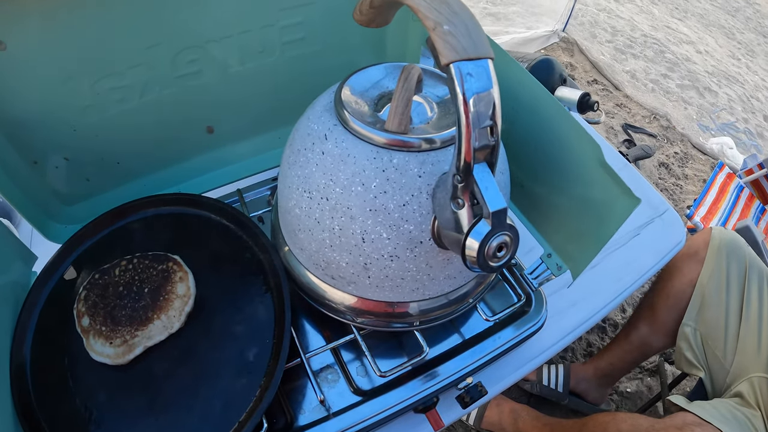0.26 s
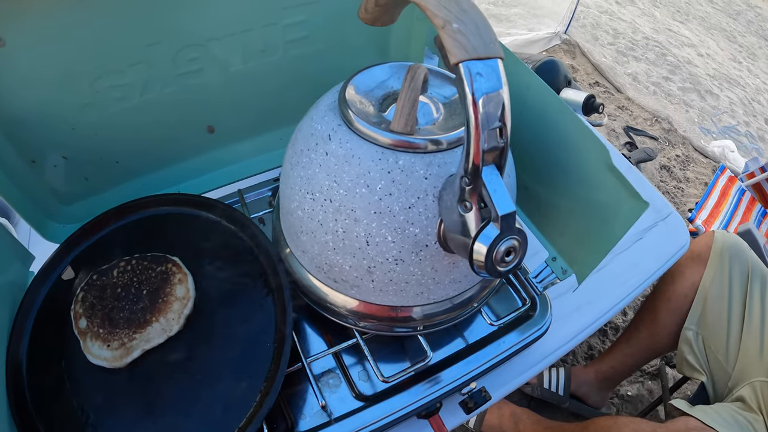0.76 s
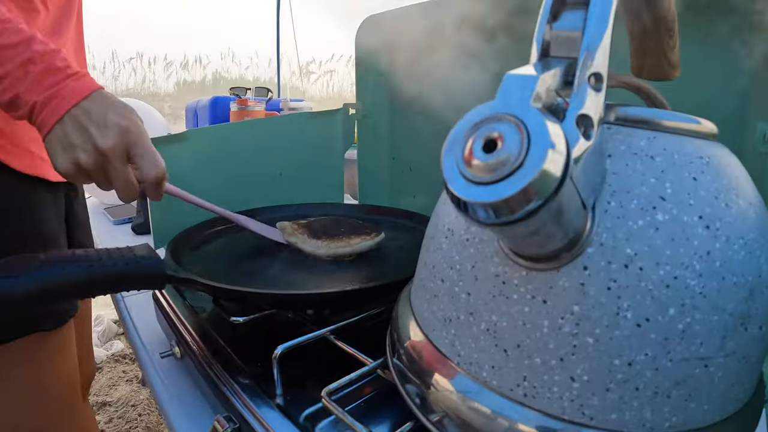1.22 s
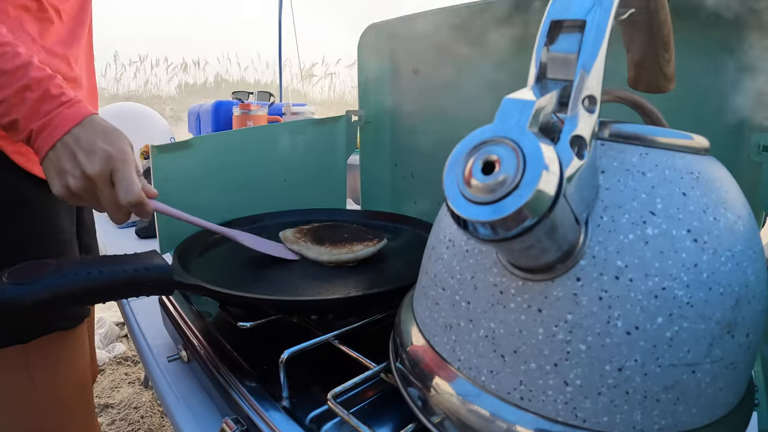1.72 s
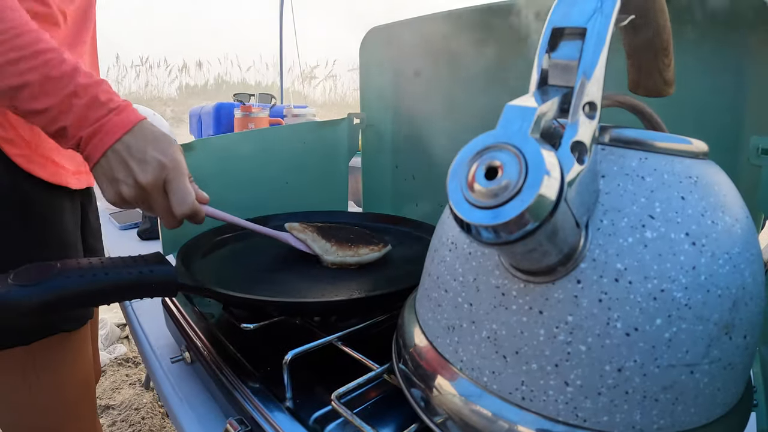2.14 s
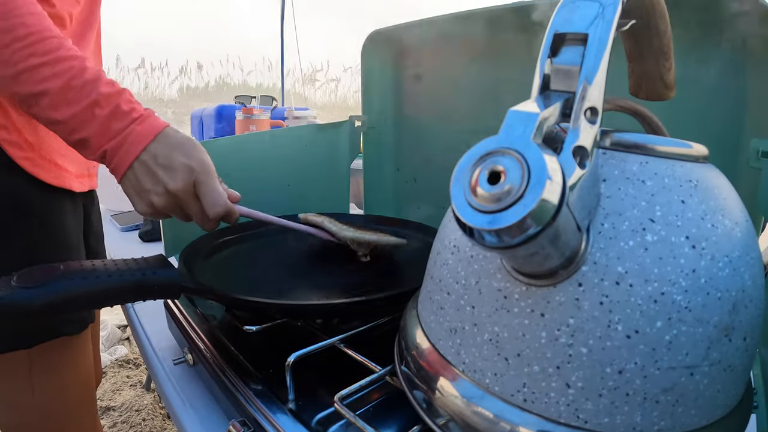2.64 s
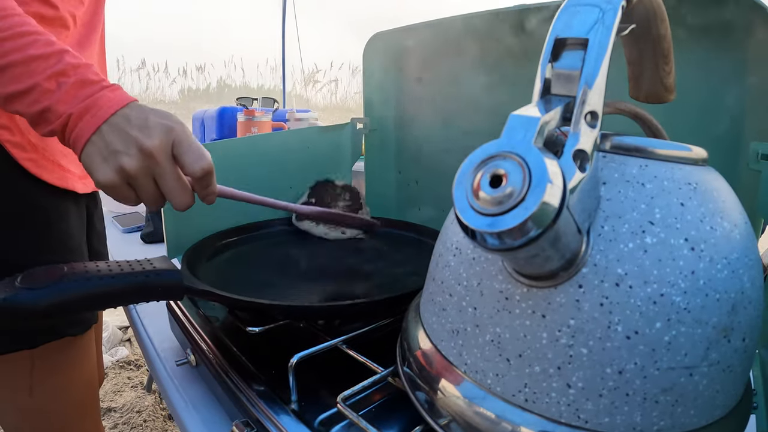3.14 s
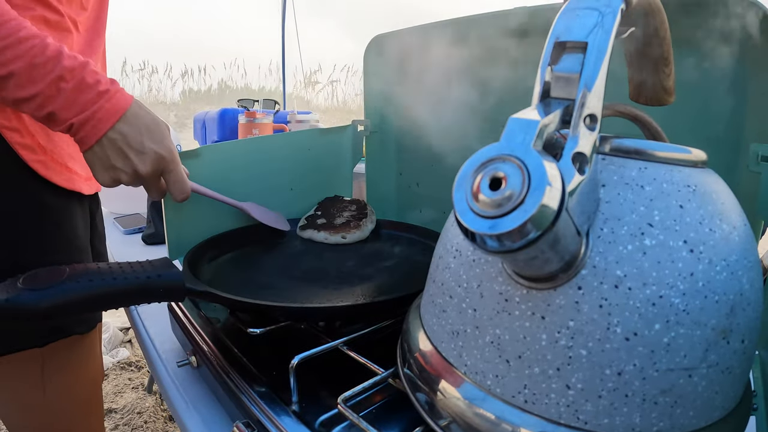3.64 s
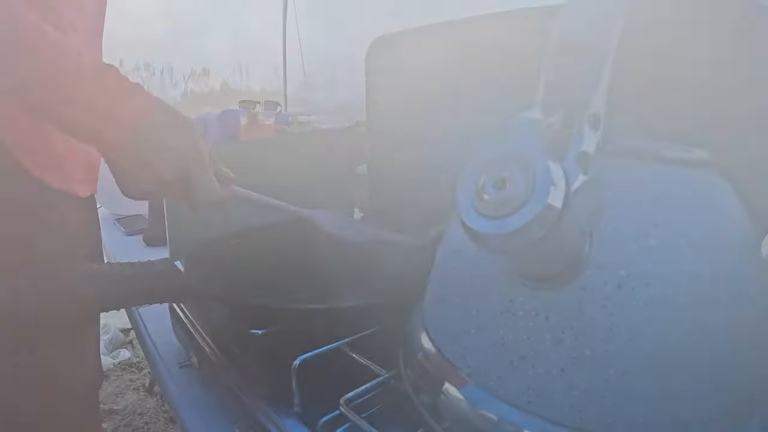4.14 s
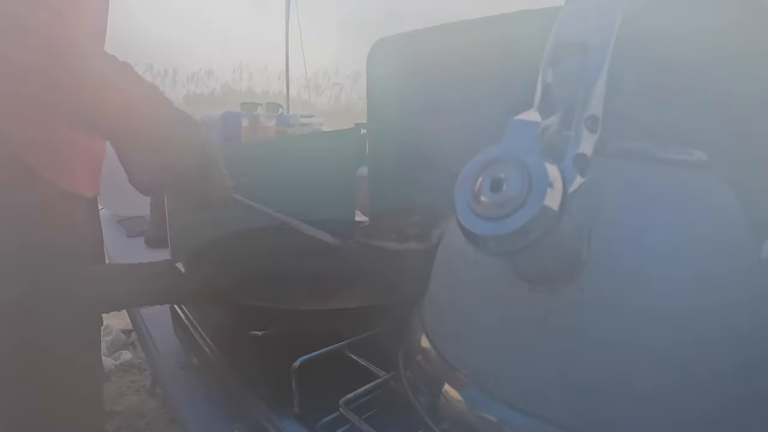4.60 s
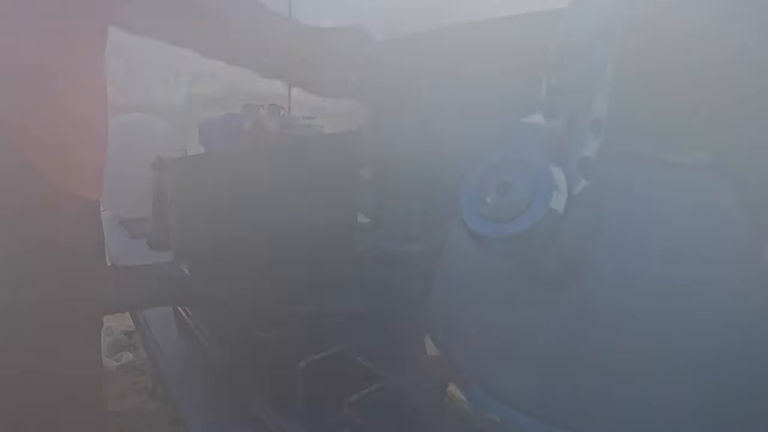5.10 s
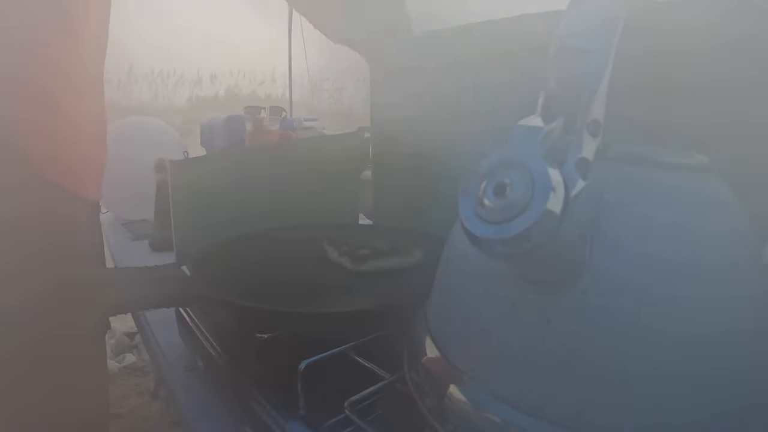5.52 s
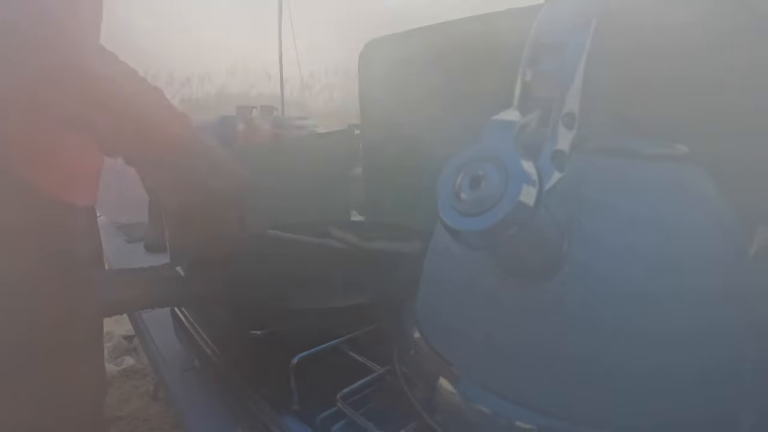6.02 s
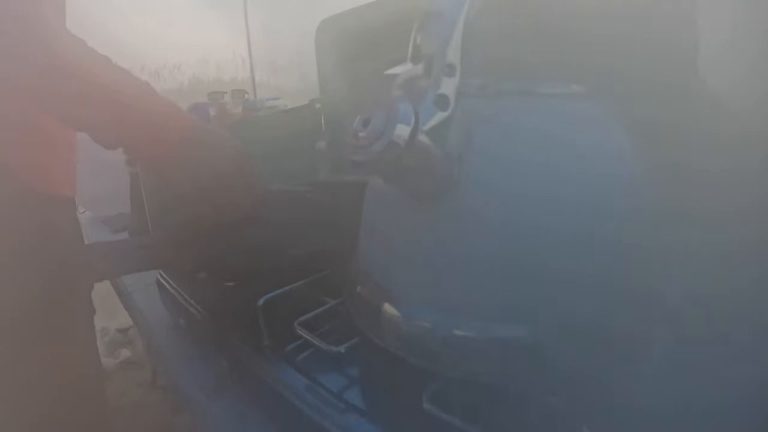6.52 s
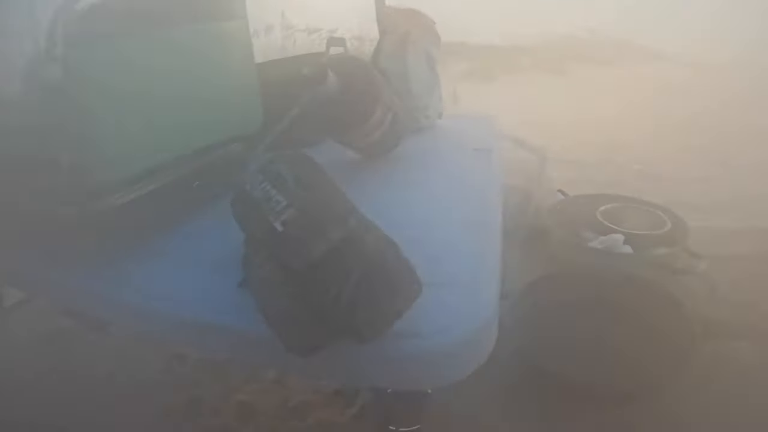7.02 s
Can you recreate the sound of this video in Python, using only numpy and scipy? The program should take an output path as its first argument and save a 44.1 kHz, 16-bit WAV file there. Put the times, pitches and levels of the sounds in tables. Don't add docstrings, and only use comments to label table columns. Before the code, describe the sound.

Outdoors, close to a small stereo camera, a gas burner roars low while its jet rings in the stove's metal. At about one second the sound cuts briefly to silence, then resumes beside a kettle: steam hisses and a thin high whistle sings, falters, and jumps to a stronger lower note that wavers upward. Two soft spatula taps and light wind puffs pass before the whistle weakens as the camera swings away.

```python
import sys
import numpy as np
from scipy import signal
from scipy.io import wavfile
from scipy.ndimage import uniform_filter1d

SR = 44100
rng = np.random.default_rng(int(sys.argv[2]) if len(sys.argv) > 2 else 0)


def materialize(psi):
    bounded = np.clip(np.atleast_2d(psi).T, -1, 1)
    quanta = np.round(bounded * 32767).astype(np.int16)
    wavfile.write(sys.argv[1], SR, quanta)


def how_loud(loudness_db):
    steps = np.asarray(loudness_db, float) / 20
    return 10 ** steps


N = 319794

VIEW_END, RESUME = 1.0115, 1.0925
FLIP = 1.7835
DRIFT, SIDESTEP, SWING = (3.6, 4.78), (5, 6.49), (6.63, 7.265)


def evened(x):
    return x / np.sqrt(np.mean(abs(x) ** 2) + 1e-20)


def read(points, hz):
    f, value = np.transpose(points)
    return np.interp(np.log(hz + 1), np.log(f + 1), value, left=value[0], right=value[-1])


def columns(rows, t):
    s, *values = np.transpose(rows)
    return [np.interp(t, s, v) for v in values]


def ramp(t, start, end):
    return np.clip((t - start) / (end - start), 0, 1)


def bumps(rows, t):
    return sum(height * np.exp(-((t - s) / half) ** 2) for s, half, height in rows)


def wander(hz):
    return evened(signal.lfilter(*signal.butter(2, hz, fs=SR), rng.standard_normal(N)))


def moved(t, amounts):
    return sum(amount * ramp(t, *move) for amount, move in zip(amounts, (DRIFT, SIDESTEP, SWING)))


def humps(modes, hz, scale=1):
    power = 0
    for f, width, db in modes:
        power = power + how_loud(2 * db) / (1 + (2 * (hz - f * scale) / width) ** 2) ** 1.48
    return np.sqrt(power)


def grid():
    return np.fft.rfftfreq(2048, 1 / SR)[:, None], np.arange(N // 512 + 5) * 512 / SR


def unit(shape, hz, lo_hz, hi_hz):
    band = (hz > lo_hz) * (hz < hi_hz)
    return shape / np.sqrt((shape ** 2 * band).sum(0) * 4)


def noise(shape, side_db, tied, lean, patchy_db):
    draws = rng.standard_normal((shape.shape[1], shape.shape[0], 5), dtype=np.float32)
    a, b, c, d, patches = draws.T
    patches = uniform_filter1d(patches, size=10, axis=0)
    patches = evened(uniform_filter1d(patches, size=10, axis=1))
    tied = np.clip(tied, 0, 1)
    mid = a + 1j * b
    own = np.sqrt(1 - tied ** 2) * (c + 1j * d)
    side = how_loud(side_db) * (tied * np.exp(1j * lean) * mid + own)
    spectra = np.array([mid - side, mid + side]) * shape * how_loud(patchy_db * patches)
    pair = signal.istft(spectra, nperseg=2048, noverlap=1536)[1]
    return pair[:, :N] / np.sqrt(8 / 3)


# frequency in Hz, side minus mid in dB.
WIDTH_ABOVE = [(60, -32.5), (150, -42), (380, -19), (950, -10), (2380, -6.5), (5980, -12), (15000, 3.5)]
# frequency in Hz, side minus mid in dB.
WIDTH_BESIDE = [(60, -23), (150, -33.5), (400, -14), (1000, -31.5), (2500, -14), (4000, -42), (5500, 1),
                (8000, -17.5), (15000, -4)]


def width_db(hz, t):
    open_s = 3.65
    turned_db = -46 + 17 * ramp(t, open_s - .1, open_s + .05) + moved(t, (8.5, -0.5, 5))
    return np.where(t < RESUME, read(WIDTH_ABOVE, hz), read(WIDTH_BESIDE, hz) + turned_db + 20)


# time in seconds, half length in seconds, level in dB.
WIND_PUFFS = [
    (5.211, 0.08, -31),
    (6.103, 0.1, -41.5),
    (6.752, 0.069, -66),
]
# time in seconds, level in dB, pitch in Hz, seconds to fade by 60 dB.
SPATULA_TAPS = [
    (3.293, -38, 860, 0.092),
    (3.87, -40, 740, 0.09),
]


def small_sounds():
    t = np.arange(N) / SR
    puff = bumps([(s, half, how_loud(db)) for s, half, db in WIND_PUFFS], t)
    out = puff * (wander(90) + .5 * np.array([wander(180), wander(160)]))
    for s, db, hz, t60 in SPATULA_TAPS:
        since = np.maximum(t - s, 0)
        out = out + how_loud(db - 60 * since / t60) * np.sin(2 * np.pi * hz * since)
    return out


# frequency in Hz, level in dB per Hz.
FLAME_ROAR = [(12, -36.5), (20, -3), (70, 3), (119, 1), (151, -2.5), (198, -2.5), (426, -14.5), (558, -25),
              (900, -42), (1170, -49), (1980, -120)]
# frequency in Hz, width in Hz, level in dB.
METAL_ABOVE = [(1198.5, 32.6, 1), (1353, 95, -13), (1730, 175, -19.5), (1880, 77, -27.5), (3388, 90, -19.5),
               (3540, 190, -27), (4340, 340, -31.5), (4870, 120, -32.5), (5790, 300, -34),
               (7100, 200, -41.5), (9750, 300, -48.5), (12000, 400, -53)]
# frequency in Hz, width in Hz, level in dB.
METAL_BESIDE = [
    (1236.3, 20, 1),
    (1286, 142, -13.5),
    (1800, 84, -18.5),
    (2390, 67, -17.5),
]
# frequency in Hz, level in dB.
GAS_HISS = [(600, -33.5), (900, -30.5), (1500, -43), (2300, -42), (5000, -40.5), (8000, -49.5),
            (14000, -73), (16000, -81)]


def burner():
    hz, t = grid()
    above = t < RESUME
    settle = np.exp(-(np.maximum(t - RESUME, 0) / 0.71) ** 2)
    lean_in = ramp(t, VIEW_END / 2, VIEW_END)
    roar_db = np.where(above, -26 - 1.5 * lean_in, -36.5 + 7.5 * settle)
    jet_db = np.where(above, -25.5 + 1 * lean_in, -39.5 + 8 * settle)
    jet_db = jet_db - 13 * ramp(t, SWING[1] - 0.19, SWING[1])

    roar = how_loud(read(FLAME_ROAR, hz) - 30 * np.log2(np.maximum(hz / 900, 1)))
    roar = unit(roar, hz, 30, 500) * how_loud(roar_db + 11.0)
    shade_db = (t > RESUME) * 14 * np.log2(np.maximum(hz / 3000, 1))
    bed = how_loud(read(GAS_HISS, hz) - shade_db)
    metal = np.where(above, humps(METAL_ABOVE, hz), humps(METAL_BESIDE, hz))
    jet = unit(np.hypot(metal, bed), hz, 1100, 1400) * how_loud(jet_db + 10.5)
    return noise(np.hypot(roar, jet), width_db(hz, t), .93, 1.72, 2.1) * how_loud(0.47 * wander(15.0))


# frequency in Hz, level in dB.
FIRST_HISS = [(900, -29.5), (2000, -2), (2900, -19), (3400, -5.5), (4300, 5), (5300, -13.5), (6000, -12.5),
              (6900, -18.5), (8500, -15), (9000, -49), (10000, -25), (10900, -46), (15000, -53)]
# frequency in Hz, level in dB.
MAIN_HISS = [(900, -23), (2400, -11.5), (3000, -11.5), (4050, -14.5), (4400, -5), (5300, -5), (6100, -7.5),
             (7000, -12.5), (8500, -19.5), (10400, -24), (11300, -44), (12300, -30), (13800, -38),
             (15600, -47.5)]
# multiple of its pitch, width in Hz, level in dB.
BREATH = [
    (1.76, 220, -0.5),
    (2.77, 200, -11.5),
    (.72, 120, -26),
    (1.2, 270, -9.5),
    (3.9, 450, -28),
]
# delay in seconds, share of the sound.
NEAR_ECHOES = [
    (.0019, 0.034),
    (.0031, 0.19),
]
# frequency in Hz, side minus mid in dB.
FINE_WIDTH = [(10000, -25), (11000, -10), (11800, 9), (12300, -2), (13700, 4), (15600, 2.5)]


def steam():
    hz, t = grid()
    first = t < FLIP
    hiss_db = np.where(first, -37 + 3 * ramp(t, RESUME, FLIP), -33 + moved(t, (-4.5, -1, -6.5)))
    sizzle_db = -8 * (1 - ramp(t, FLIP, FLIP + .16)) + moved(t, (1.5, 0.5, 4))
    colour = how_loud(np.where(first, read(FIRST_HISS, hz), read(MAIN_HISS, hz)))
    breath = (t > FLIP) * humps(BREATH, hz, columns(MAIN_PITCH, t)[0])
    colour = np.hypot(colour, breath) * how_loud((hz > 10700) * (hz < 15600) * sizzle_db)
    stretch = 1 + 0.013 * t
    echoes = sum(share * np.exp(2j * np.pi * hz * delay * stretch) for delay, share in NEAR_ECHOES)
    hiss = unit(colour * abs(1 + echoes), hz, 4134, 4718) * how_loud(hiss_db + 8.0) * (t > VIEW_END)
    fine_db = np.where((hz > 10000) & (t > FLIP), read(FINE_WIDTH, hz), -99)
    side_db = np.maximum(width_db(hz, t), fine_db)
    return noise(hiss, side_db, 0.5, .5, 1.95) * how_loud(0.9 * wander(55))


# frequency in Hz, level in dB.
ECHO_FACING = [
    [(2460, -21.5), (2520, -17.5), (2600, -18), (2655, -25.5), (2700, -19), (2800, -16.5), (2860, -17),
     (2980, -15)],
    [(4920, -18), (5060, -24.5), (5200, -20), (5500, -20), (5620, -21.5), (5740, -33.5), (5900, -25.5)],
    [(7400, -34.5), (7650, -39.5), (8100, -36.5), (8350, -36), (8600, -47.5), (8800, -50)],
]
# frequency in Hz, level in dB.
ECHO_ASIDE = [
    [(2800, -19.5), (3000, -16.5)],
    [(5600, -21), (6000, -28)],
    [(8400, -42.5), (9000, -45)],
]
# time in seconds, half length in seconds, dip in dB.
SWING_DIPS = [
    (6.84, 0.013, -6),
    (6.96, 0.043, -7.5),
    (7.075, 0.011, -7.5),
    (7.11, 0.013, -9),
    (7.17, 0.038, -10.5),
]


def partials_db(hz, t):
    aside, out = ramp(t, *SIDESTEP), []
    drift_db, swing_db = (1, -4.5, -5.5), (-13.5, -3.5, -5)
    for k in range(len(ECHO_FACING)):
        slide_hz = (k == 0) * 30.4 * ramp(t, 1.78, DRIFT[1])
        facing = read(ECHO_FACING[k], (k + 1) * (hz - slide_hz)) + drift_db[k] * ramp(t, *DRIFT) ** 0.36
        level = (1 - aside) * facing + aside * read(ECHO_ASIDE[k], (k + 1) * hz)
        level = level + swing_db[k] * ramp(t, *SWING) ** (k + 1)
        out.append(level + (k == 0) * bumps(SWING_DIPS, t))
    return out


def voice(turns, levels_db, flutters):
    total = 0
    for k, (db, share) in enumerate(zip(levels_db, flutters)):
        shake = 1 + share * (wander(130) + 1j * wander(170)) + 0.76 * share * wander(13.5)
        total = total - np.sqrt(2) * how_loud(db) * shake * np.exp(2j * np.pi * (k + 1) * turns)
    return total


# time in seconds, pitch in Hz.
FIRST_PITCH = [(1.11, 3980), (1.204, 4025), (1.21, 4070), (1.36, 3963), (1.374, 4076), (1.394, 4020),
               (1.66, 3984), (1.76, 4125), (1.77, 4060)]
# time in seconds, pitch in Hz.
MAIN_PITCH = [(1.795, 2510), (2.237, 2535), (2.594, 2602), (2.666, 2646), (3.068, 2643), (3.111, 2693),
              (3.954, 2752), (4.105, 2768), (4.226, 2692), (4.627, 2884), (5.116, 2854), (5.971, 2865),
              (6.329, 2975), (6.555, 2840), (6.795, 2787), (7.166, 2980), (7.25, 2964)]
# time in seconds, half length in seconds, depth from 0 to 1.
FALTERS = [
    (1.725, .005, .8),
    (1.762, .004, .4),
]
# time in seconds, pitch in Hz, level in dB.
FALSE_STARTS = [
    (1.1, 2317, -61),
    (1.72, 2310, -41),
    (1.73, 2380, -34),
    (1.745, 2365, -48),
    (1.752, 2350, -29.5),
    (1.772, 2353, -35),
    (1.78, 2390, -19.5),
    (1.79, 2480, -25),
]
# time in seconds, push in Hz, half length in
# seconds.
GULPS = [(1.886, -65, 0.02083), (2.07, 64, 0.00778), (2.592, -53, 0.01275), (3.038, 73.5, 0.00946),
         (3.239, -45.5, 0.018), (3.372, -128, 0.081), (3.648, 46.5, 0.01395), (3.762, 57, 0.02177),
         (3.89, 41.5, 0.042), (4.339, -42.5, 0.0141), (4.488, 34, 0.0259), (4.875, -55.5, 0.037),
         (5.168, 32.5, 0.03), (5.418, 29, 0.03), (5.514, 34.5, 0.013), (5.563, 58.5, 0.024),
         (5.712, -66.5, 0.025), (6, 42, 0.021), (6.14, -49.5, 0.0088), (6.351, -77.5, 0.043),
         (6.513, 35, 0.021), (7.036, 29, 0.022),
         (2.72, 30, .012),
    (4.111, 50, .01),
    (4.694, 30, .02),
    (7.087, -43, 0.011),
    (7.133, 46.5, .012),
]
TONE_MIXES = [
    (0, 1),
    (1, 1),
    (1, -1),
    (2, -1),
    (2, 1),
]


def whistle():
    t = np.arange(N) / SR
    flipped = np.clip((t - FLIP) / 0.01 + .5, 0, 1)
    before_flip = (1 - flipped) * (t > VIEW_END)

    high_turns = np.cumsum(columns(FIRST_PITCH, t)[0] + 16 * wander(54) + 14 * wander(210)) / SR
    choke = np.prod([1 - depth * np.exp(-((t - s) / half) ** 2) for s, half, depth in FALTERS], 0)
    growth = ramp(t, RESUME, FLIP)
    high_db = (-19 + 2.5 * growth, -37 + 4.5 * growth, -73.5 + 4.5 * growth)
    high = voice(high_turns, high_db, (.09, .25, .6)).real
    for db, multiple in ((-51, 0.28), (-47.5, 1.5)):
        high = high + how_loud(db) * wander(60) * np.cos(2 * np.pi * multiple * high_turns)
    high = high * choke * before_flip

    jitter = wander(51.7)
    jitter = evened(jitter - uniform_filter1d(jitter, size=3000) + .12 * jitter ** 2)
    jitter = jitter * (1 - 0.18 * np.clip((t - 6.3) / 0.27, 0, 1))
    gulps_hz = bumps([(s, half, hz) for s, hz, half in GULPS], t)
    flow_hz = columns(MAIN_PITCH, t)[0] + gulps_hz + 15 * jitter
    start_hz, start_db = columns(FALSE_STARTS, t)
    low_hz = np.where(t < FALSE_STARTS[-1][0], start_hz + 15 * jitter, flow_hz)
    low_turns = np.cumsum(low_hz + 9 * wander(250)) / SR
    first_db, second_db, third_db = partials_db(flow_hz, t)
    fifth_db = third_db - 40 + 10 * np.clip((t - 6.9) / .1, 0, 1)
    breakup = 0.27 * ramp(t, *SWING) ** 3
    low = voice(low_turns, (first_db, second_db, third_db, third_db - 31.0, fifth_db),
                (0.056 + breakup, 0.12, 0.28, 0.31, .4)) * flipped

    start = how_loud(start_db) * before_flip * np.where(start_db > -42, 1, wander(76))
    mixed = sum(how_loud(db) * np.cos(2 * np.pi * (m * high_turns + n * low_turns))
                for db, (m, n) in zip((2.0, -5, -8.5, -10, -28), TONE_MIXES))
    pan_db = moved(t, (-1.5, -1, 13))
    lead_rad = moved(t, (0.43, 0.17, -.6))
    ports = how_loud(pan_db / 2 * np.c_[1, -1].T) * np.exp(.5j * lead_rad * np.c_[-1, 1].T)
    return (low * ports).real + high - start * mixed


def scene():
    t = np.arange(N) / SR
    sound = burner() + steam() + whistle() + small_sounds()
    grown = .75 + .25 * ramp(t, FLIP, FLIP + .4)
    depth = np.clip(np.where(t < FLIP, 0.084, grown) * (1 - ramp(t, *DRIFT) ** 2), 0, 1)
    for hz in (6070 - 80, 6070 + 80):
        sound = sound - depth * signal.lfilter(*signal.iirpeak(hz, hz / 490, SR), sound)
    return sound


def roll_off(x):
    return signal.sosfilt(signal.butter(12, 15700, fs=SR, output="sos"), x)


def record(dry):
    t = np.arange(N) / SR
    tail = how_loud(-25 - 4900 * np.maximum(t - VIEW_END, 0))
    rise = np.sin(np.pi / 2 * np.clip((t - RESUME) / .05, 0, 1)) ** 1.3
    edit = np.where(t < VIEW_END, 1, np.maximum(tail, rise))
    return roll_off(dry * edit)


dry = scene()
out = record(dry)
materialize(out)
```